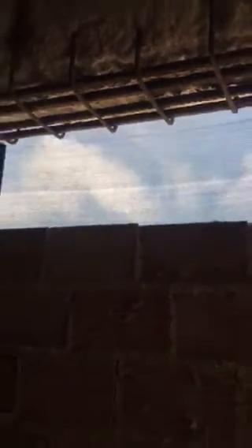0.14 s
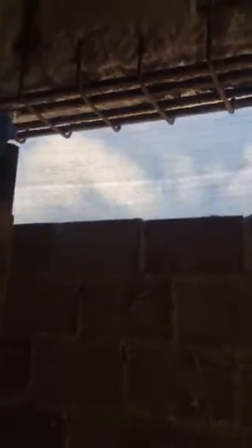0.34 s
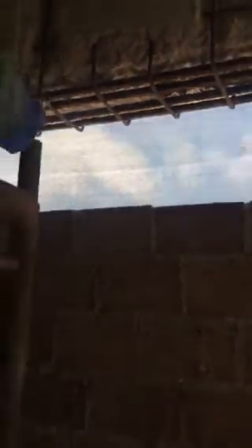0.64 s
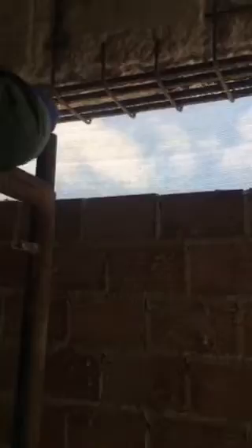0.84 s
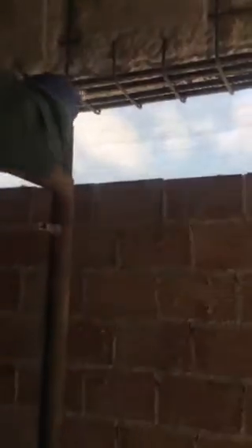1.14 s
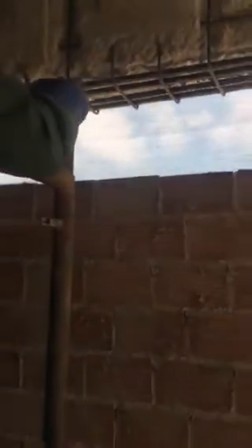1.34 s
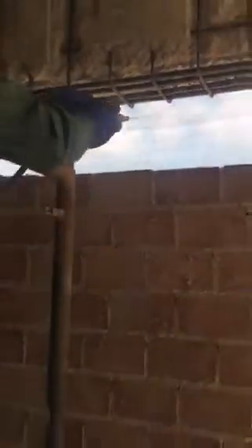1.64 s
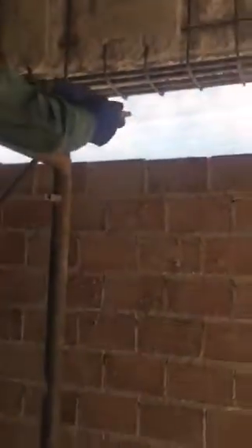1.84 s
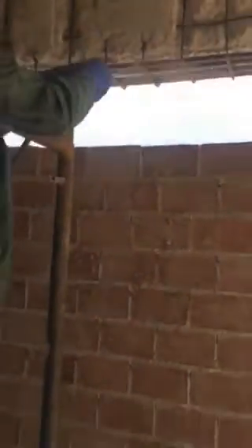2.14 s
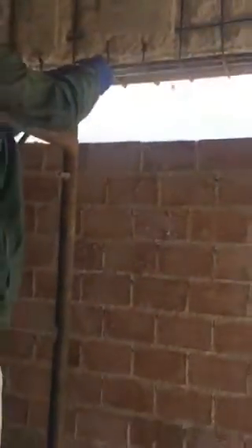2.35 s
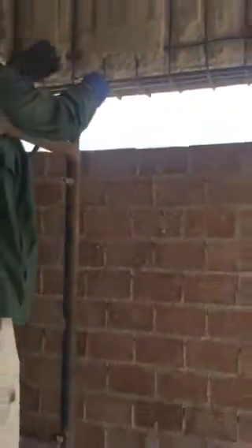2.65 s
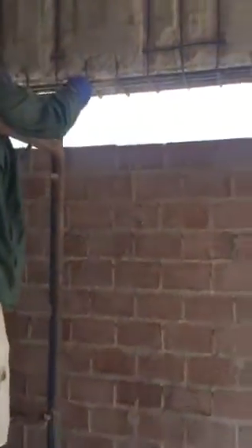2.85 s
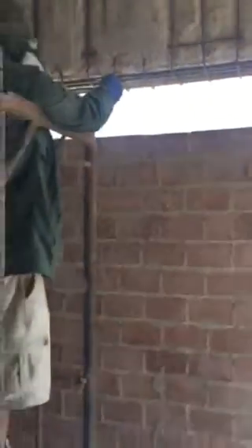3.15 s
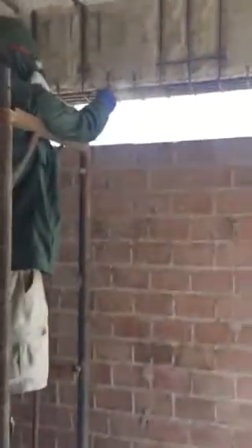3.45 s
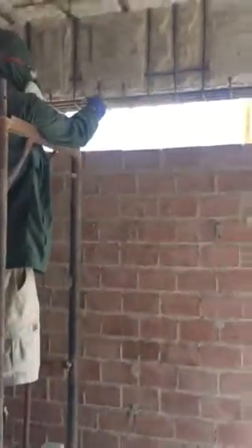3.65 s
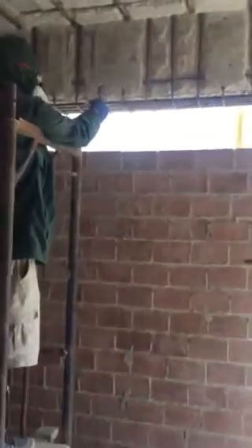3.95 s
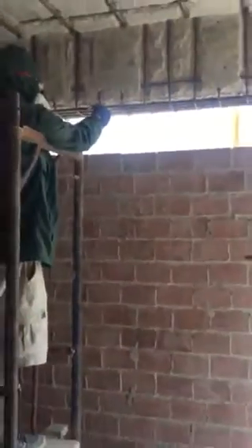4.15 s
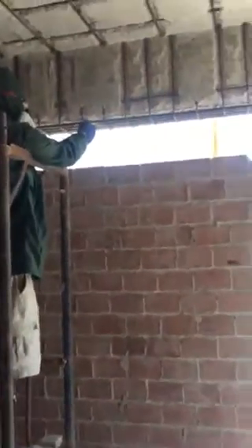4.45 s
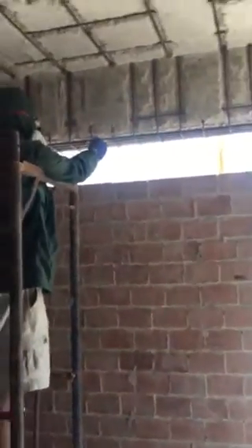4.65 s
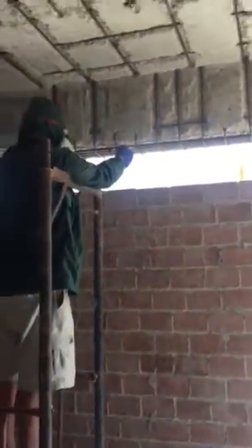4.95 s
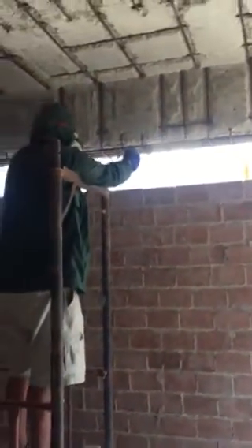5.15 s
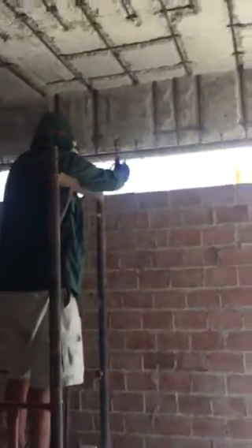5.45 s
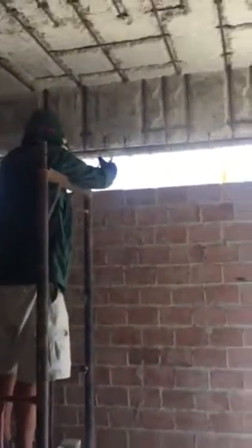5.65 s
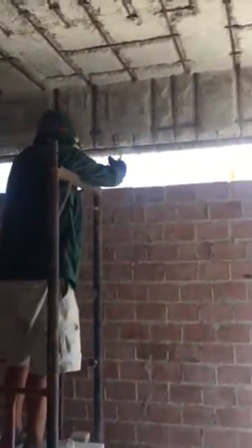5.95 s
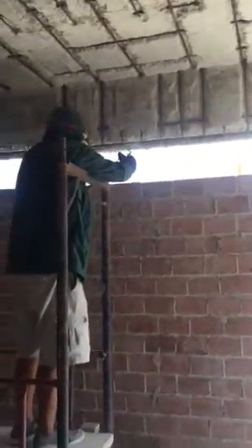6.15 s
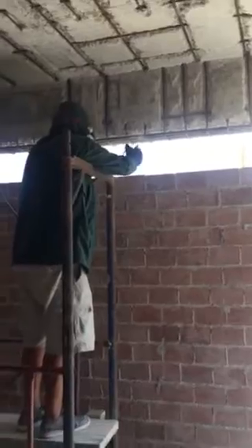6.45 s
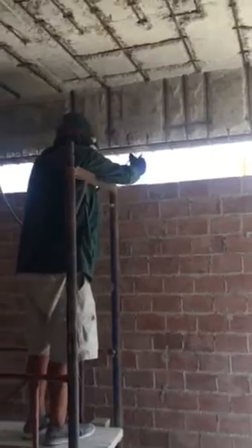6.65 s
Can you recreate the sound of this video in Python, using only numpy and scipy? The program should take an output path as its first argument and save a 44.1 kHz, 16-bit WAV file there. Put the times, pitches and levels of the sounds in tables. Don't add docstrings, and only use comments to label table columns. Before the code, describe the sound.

A compressor's low steady drone, then a valve thump and a sudden loud, gritty sandblasting hiss that scours concrete and steel until the end.

```python
import sys
import numpy as np
from scipy import signal
from scipy.fft import rfft, irfft, next_fast_len
from scipy.io import wavfile
from scipy.ndimage import uniform_filter1d, map_coordinates

SR = 44100
rng = np.random.default_rng(int(sys.argv[2]) if len(sys.argv) > 2 else 0)


def materialize(psi):
    bounded = np.clip(np.atleast_2d(psi).T, -1, 1)
    quanta = np.round(bounded * 32767).astype(np.int16)
    wavfile.write(sys.argv[1], SR, quanta)


def magnitude_from_level(level_db):
    exponent = np.asarray(level_db, float) / 20
    return 10 ** exponent


N = 299439
TIME = np.arange(N) / SR
BLOCK = 1024

# time in seconds, hiss level in dB.
AIR_PRESSURE = [
    (1.62, -33),
    (1.646, -10),
    (1.678, -4),
    (1.746, -17),
    (1.898, -12),
    (1.924, -17),
    (2.004, -19.5),
    (2.05, -17.5),
    (2.24, -19.5),
]
# time in seconds, bite of the grit in dB,
# how far the jet spills off the edge from -1 to 1.
STROKES = [(1.68, -6, -1.1), (1.746, 2, -0.75), (1.898, -6, -0.98), (2, -4, -0.56), (2.16, -3.5, -0.87),
           (2.24, -1.5, 1), (2.55, 2, 0.058), (2.95, -0.3, 0.58), (3.15, -3, 0.52), (3.55, 1, 0.25),
           (3.95, 0.8, -0.58), (4.35, 0.6, -.7), (4.75, 0.6, -0.56), (4.95, 1.5, -0.66), (5.35, 0, 0.074),
           (5.75, -1.5, 0.089), (5.95, 1.2, -0.21), (6.79, -0.6, .5)]
# frequency in Hz, level in dB per Hz.
HISS_COLOUR = [(2500, -19), (4500, -0.5), (6000, 1.5), (9000, 1), (12000, 0), (14000, -1), (15200, -1),
               (15800, -3)]
# share of its centre frequency, level in dB per Hz.
SCOUR_COLOUR = [(.3, -23.5), (.5, -5.5), (.68, -1.5), (1, 0), (1.35, -2), (1.8, -7), (3, -38)]
# share of its centre frequency, level in dB per Hz.
ROAR_COLOUR = [(.35, -21.5), (.55, -22), (.7, -4), (.85, 0), (1.15, 1), (1.5, -3), (2.2, -9), (3.5, -55)]
# frequency in Hz, level in dB per Hz.
RUMBLE_COLOUR = [(40, -14), (100, -5), (250, 0), (500, 10.5), (800, 14.5), (1500, -23)]


def nozzle():
    bite_db, spill = curves(STROKES)
    since_open_s = TIME - AIR_PRESSURE[0][0]

    def scour_hz(t):
        return 3116 * (1 - 0.1 * curves(STROKES, t)[1])

    def hiss_db(hz, t):
        return along(HISS_COLOUR, hz) + bloom_db(hz, t)

    def scour_db(hz, t):
        return along(SCOUR_COLOUR, hz / scour_hz(t)) + bloom_db(hz, t)

    def roar_db(hz, t):
        return along(ROAR_COLOUR, hz / 1225) + bloom_db(hz, t)

    hiss = rush(hiss_db, patchy_db=0.36, streak_db=-0.2, source=gritty_air())
    scour = rush(scour_db, patchy_db=1.06, streak_db=0.15, source=gritty_air())
    roar = rush(roar_db, patchy_db=-0.7, streak_db=-0.2, source=gritty_air())
    rumble = rush(lambda hz, t: along(RUMBLE_COLOUR, hz), patchy_db=1.5)
    whistle = rush(lambda hz, t: resonance_db(hz, 6350, 260), patchy_db=0.5)

    jet = hiss + magnitude_from_level(-2.5 + bite_db) * scour
    jet += magnitude_from_level(-12.5 + 4.5 * spill) * roar
    jet += magnitude_from_level(-27.5 + 6.5 * spill) * rumble
    jet += magnitude_from_level(-35 + 5 * since_open_s) * whistle

    flow_db = curves(AIR_PRESSURE)[0] + 0.19 * bite_db + 0.13 * wobble(13)
    opening = np.clip((TIME - 1.628) / 0.014, 0, 1)
    return magnitude_from_level(flow_db) * opening * jet


def gritty_air():
    return room(grit(2500, spread_db=2.5), t60=0.2, wet_db=-6)


def grit(per_second, spread_db):
    size_db = spread_db * np.minimum(rng.exponential(size=N), 3.5)
    size = magnitude_from_level(size_db) * rng.standard_normal(N)
    hits = rng.random(N) < per_second / SR
    return unit(size * hits) * 0.43 + rng.standard_normal(N)


# time in seconds, length in seconds, pitch in Hz, level in dB.
POCKETS = [
    (1.768, 0.1, 2000, 5.5),
    (2.2, 0.18, 695, 15),
    (2.7, 0.76, 3300, 1.5),
    (3.45, 0.77, 1970, 4.5),
    (3.82, 1, 3050, 4.5),
    (5.205, 0.27, 8500, 3),
    (6.3, .84, 1450, 3),
    (6.6, 0.65, 6350, 1.5),
    (6.7, 0.33, 3460, 3),
]
# pitch in Hz, level in dB.
ROOM_COLOURS = [(960, 2), (2200, 1.5), (3350, 1)]


def bloom_db(hz, t):
    def peak(centre_hz):
        width = 0.11
        return np.exp(-((hz / centre_hz - 1) / width) ** 2)

    pockets_db = sum(db * np.exp(-(2 * (t - s) / length) ** 2) * peak(centre_hz)
                     for s, length, centre_hz, db in POCKETS)
    away = np.clip((t - 4.07) / 1.3 + 0.5, 0, 1)
    return pockets_db + away * sum(db * peak(centre_hz) for centre_hz, db in ROOM_COLOURS)


def room(x, t60, wet_db):
    hop = SR // 5
    t = np.arange(SR // 4) / SR
    fade = np.sin(np.pi * np.arange(2 * hop) / (2 * hop))
    padded = np.pad(x, (hop, 2 * hop))
    out = np.zeros(len(padded) + len(t))
    for start in range(0, N + hop, hop):
        tail = rng.standard_normal(len(t)) * magnitude_from_level(-60 * t / t60) * (t > 0.002)
        wet = signal.fftconvolve(padded[start:start + 2 * hop] * fade, tail / np.linalg.norm(tail))
        out[start:start + len(wet)] += wet
    return unit(x + magnitude_from_level(wet_db) * out[hop:hop + N])


# time in seconds, pitch in Hz, length in seconds, peak level in dB.
VALVE_THUMP = (1.693, 125, .024, -21)
# time in seconds, length in seconds, level in dB.
HOSE_RINGS = [
    (1.733, 0.042, -30),
    (1.772, 0.053, -31),
    (1.82, .04, -35),
]
# time in seconds, length in seconds, level in dB.
PUFFS = [
    (1.69, 0.038, -28.5),
    (1.82, 0.018, -33),
    (1.855, 0.022, -27.5),
    (1.865, .09, -40),
    (1.895, 0.018, -32),
    (2.055, .02, -41),
]
# frequency in Hz, level in dB per Hz.
BUFFET_COLOUR = [(30, -10), (80, 3), (200, 9.5), (350, -1), (600, 6), (900, -19), (1500, -28)]


def surge():
    s, hz, length, db = VALVE_THUMP
    thump = bursts([(s, length, db)]) * np.sin(2 * np.pi * hz * (TIME - s))
    ring = rush(lambda hz, t: resonance_db(hz, 965, 35), patchy_db=0)
    buffet = rush(lambda hz, t: along(BUFFET_COLOUR, hz), patchy_db=0.5)
    return thump + bursts(HOSE_RINGS) * ring + bursts(PUFFS) * buffet


# time in seconds, gain in dB.
GAIN = [
    (1.67, -0.5),
    (1.72, -10),
    (1.8, -10),
    (1.92, -19),
    (2.1, -31),
    (2.2, -19),
    (3, -20),
    (4, -23),
    (6.79, -23.5),
]
# time in seconds, level in dB.
WALK = [
    (0, -12),
    (.85, -6),
    (1.1, -2),
    (1.63, -1.5),
    (2, -7),
    (2.25, -2.5),
    (3.15, -13),
    (4.1, 3),
    (6.79, 6),
]
# multiple of the engine cycle, level in dB.
EXHAUST = [(1, -36), (2, 2.5), (3, -35), (4, -23), (5, -18.5), (7, -14), (8, -13.5)]
# multiple of the engine cycle, level in dB.
PANEL = [(22, -20), (23, -11), (24, -14.5), (32, -17)]
# multiple of the engine cycle, level in dB.
CASING = [(9, -34), (11.5, -21), (15, -24), (17.5, -33), (19, -24), (28, -21), (40, -22), (42, -27)]
# frequency in Hz, level in dB per Hz.
FAN_LOW_COLOUR = [(24, -45), (45, -20), (80, -21), (105, -30), (160, -17), (243, -25)]
# frequency in Hz, level in dB per Hz.
FAN_COLOUR = [(243, -22), (422, -25), (570, -13.5), (663, -17), (965, -11.5), (1070, -16.5), (1900, -17.5),
              (7730, -37)]
# frequency in Hz, level in dB per Hz.
LEAK_COLOUR = [(3000, -13), (7000, -10), (10000, -26), (12000, 3), (16000, 4)]


def compressor():
    (gain_db,), (sixth_db,) = curves(GAIN), curves(WALK)
    fifth_db = np.clip(-5.5 - 1.3 * sixth_db, -14, 7.5)
    seventh_db = 9 + 0.85 * sixth_db - 12 * np.clip(TIME - 2.8, 0, 3)
    panel_top_db = -0.5 - 0.58 * sixth_db
    room_db = {5: fifth_db, 7: seventh_db, 32: panel_top_db}

    cycle_hz = 24.665
    angle = 2 * np.pi * (cycle_hz * TIME + 0.003 * wobble(2))
    later = np.clip((TIME - 0.89) / 0.006 + 0.5, 0, 1)
    lost = 2 * np.pi * cycle_hz * BLOCK / SR

    def tone(k, phase):
        before = np.sin(k * angle + phase)
        after = np.sin(k * (angle + lost) + phase)
        return (1 - later) * before + later * after

    boom = magnitude_from_level(sixth_db) * tone(6, 1)
    for k, db in EXHAUST + PANEL:
        level_db = db + room_db.get(k, 0) + np.sqrt(k) / 4 * wobble(3)
        boom += magnitude_from_level(level_db) * tone(k, rng.uniform(0, 2 * np.pi))

    casing = np.zeros(N)
    for k in range(CASING[0][0], CASING[-1][0] + 1):
        if k not in dict(PANEL):
            shaky_phase = rng.uniform(0, 2 * np.pi) + 0.35 * wobble(4)
            casing += magnitude_from_level(along(CASING, k) + 2.5 * wobble(4)) * tone(k, shaky_phase)

    fan = rush(lambda hz, t: along(FAN_LOW_COLOUR[:-1] + FAN_COLOUR, hz), patchy_db=1.0, streak_db=2.0)
    leak = rush(lambda hz, t: along(LEAK_COLOUR, hz), patchy_db=2.5, streak_db=3.5)
    throb = magnitude_from_level(0.74 * np.sin(angle))
    engine = magnitude_from_level(-29) * boom + magnitude_from_level(-27.5) * casing
    return magnitude_from_level(gain_db) * (engine + magnitude_from_level(-35.5) * throb * fan + magnitude_from_level(-47) * leak)


# time in seconds, length in seconds, level in dB.
SCUFFS = [
    (.02, 0.25, -38),
    (.31, 0.045, -42),
    (.57, 0.11, -37.5),
    (.65, 0.081, -41),
    (1.2, 0.046, -38.5),
]
# frequency in Hz, level in dB per Hz.
CLOTH_COLOUR = [(1500, 1), (3500, 5.5), (6000, -1), (9000, -9), (15000, -11)]


def cloth():
    return bursts(SCUFFS) * rush(lambda hz, t: along(CLOTH_COLOUR, hz), patchy_db=2.5)


def rush(colour_db, patchy_db, streak_db=0., source=None):
    source = rng.standard_normal(N) if source is None else source
    hz, t, z = signal.stft(source, SR, nperseg=BLOCK, noverlap=768)
    patches = patchy_db * field(z.shape, 10, 12) + streak_db * field(z.shape, 3, 70)
    shaped = z * magnitude_from_level(colour_db(hz[:, None], t[None]) + patches)
    return unit(signal.istft(shaped, SR, nperseg=BLOCK, noverlap=768)[1][:N])


def field(shape, bins, frames):
    raw = rng.standard_normal(shape)
    return unit(uniform_filter1d(uniform_filter1d(raw, bins, 0), frames, 1))


def resonance_db(hz, centre_hz, width_hz):
    return -20 * np.log10(1 + ((hz - centre_hz) / width_hz) ** 2)


def bursts(rows):
    return sum(magnitude_from_level(db) * np.exp(-(2 * (TIME - s) / length) ** 2) for s, length, db in rows)


def wobble(rate):
    return map_coordinates(rng.standard_normal(400), [TIME * np.clip(rate, 0.1, 55)])


def curves(rows, t=TIME):
    s, *cols = np.transpose(rows)
    return [np.interp(t, s, c) for c in cols]


def along(points, hz):
    f, v = np.transpose(points)
    return np.interp(np.log(hz + 1e-3), np.log(f), v)


def unit(x):
    return x / np.sqrt(np.mean(x ** 2) + 1e-20)


def scene():
    return np.tile(compressor() + nozzle() + surge() + cloth(), (2, 1))


def noise_fill(x, share):
    size = 2 * BLOCK
    lead = BLOCK - 405
    window = np.sin(np.pi * (np.arange(size) + 0.5) / size)
    hz, t, z = signal.stft(np.pad(x, ((0, 0), (lead, 0))), SR, window, size)
    band = np.clip((hz - 2760) // 1380, 0, 9).astype(int)
    level = np.sqrt(np.abs(uniform_filter1d(np.abs(z) ** 2, 64, 1)))
    busy = np.where(level[0].mean(0) > level[0].mean() / 3, 1, 0.15)
    chosen = rng.random((10, len(t))) < share * busy
    swapped = chosen[band] & (band > 0)[:, None]
    noise = signal.stft(rng.standard_normal((2, N + lead)), SR, window, size)[2]
    noise = noise / np.sqrt(np.mean(np.abs(noise) ** 2))
    mixed = np.where(swapped, magnitude_from_level(0.5) * level * noise, z)
    return signal.istft(mixed, SR, window, size)[1][:, lead:][:, :N]


def band_limit(x):
    return signal.sosfilt(signal.butter(12, 16940, fs=SR, output="sos"), x)


# centre in Hz, width in Hz, level in dB.
PORT_DIPS = [(4845, 270, -4), (7680, 440, -2), (10420, 360, -5)]


def record(dry):
    size = next_fast_len(N + 8192)
    hz = np.fft.rfftfreq(size, 1 / SR)
    dips_db = sum(db * np.exp(-((hz - centre_hz) / width_hz) ** 2) for centre_hz, width_hz, db in PORT_DIPS)
    heard = irfft(rfft(dry, size) * magnitude_from_level(dips_db), size)[:, :N]
    heard = noise_fill(heard, share=0.03)
    heard = heard / (1 + np.abs(heard / 0.8) ** 6) ** (1 / 6)
    low_cut = 1 / (1 + (36 / (hz + 1)) ** 6)
    heard = irfft(rfft(heard, size) * low_cut * (hz < 15740), size)[:, :N]
    return band_limit(heard)


dry = scene()
out = record(dry)
materialize(out)
```